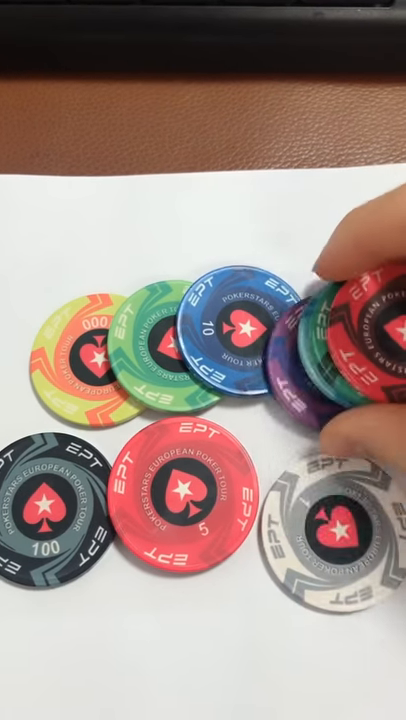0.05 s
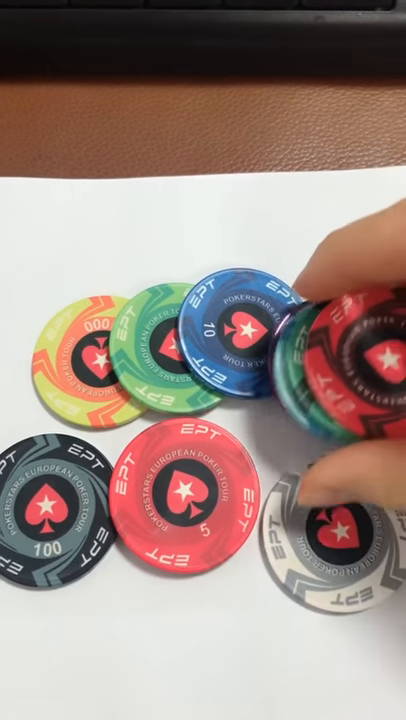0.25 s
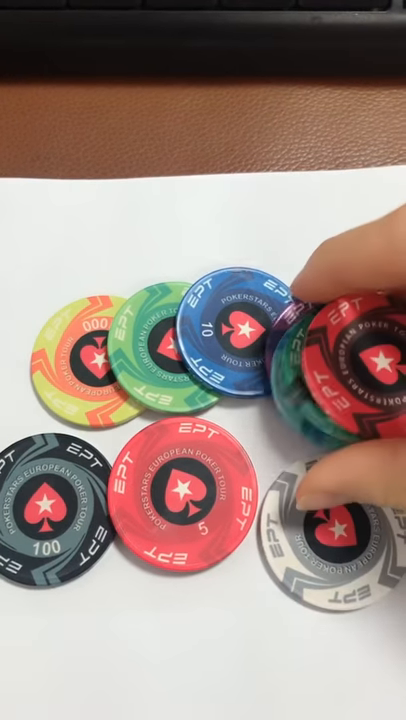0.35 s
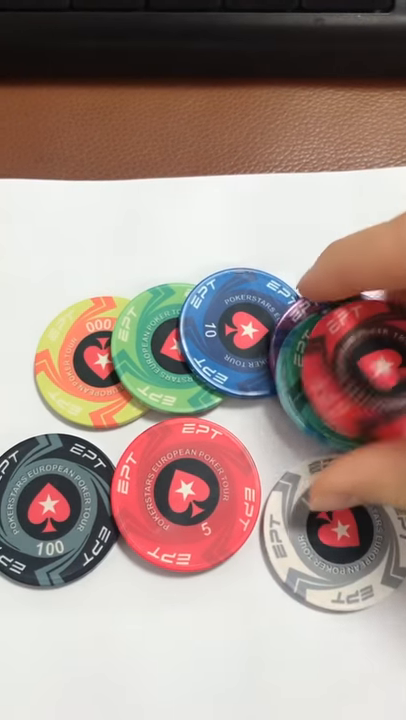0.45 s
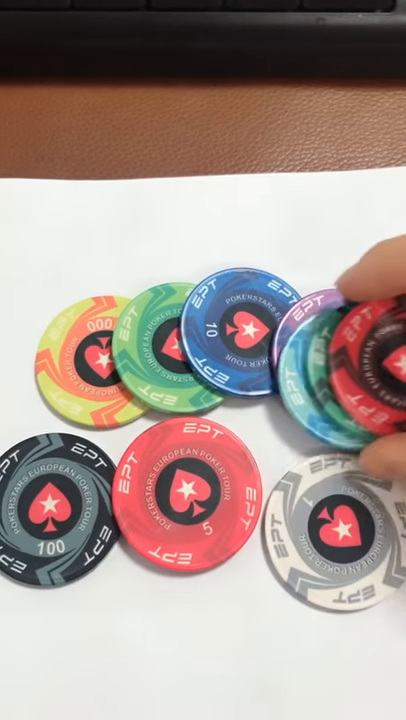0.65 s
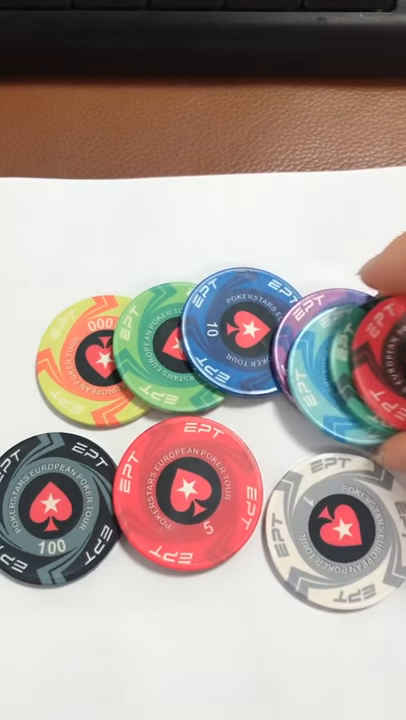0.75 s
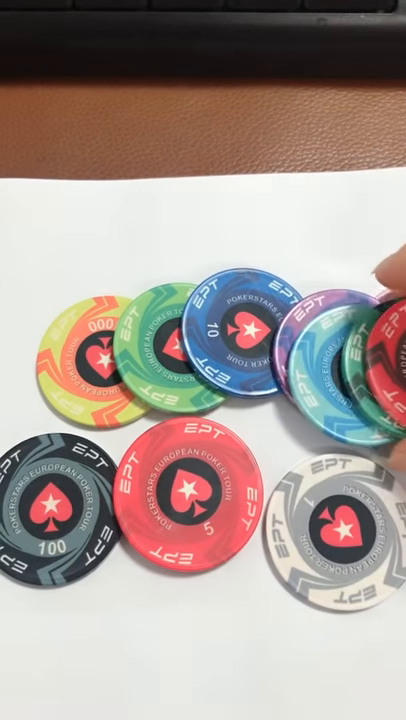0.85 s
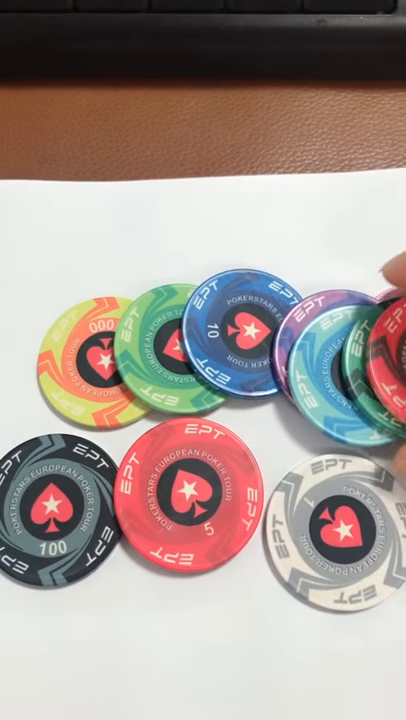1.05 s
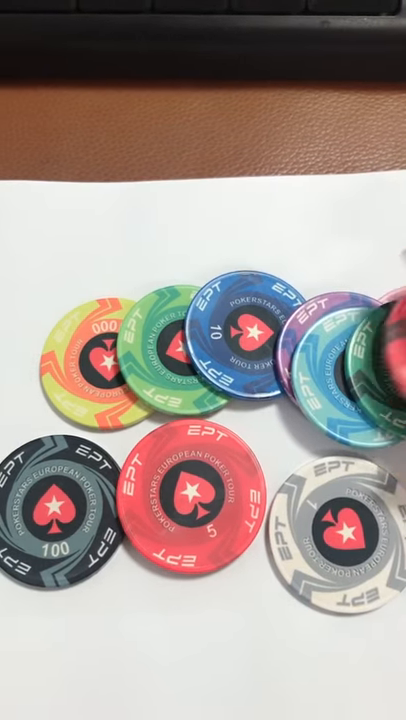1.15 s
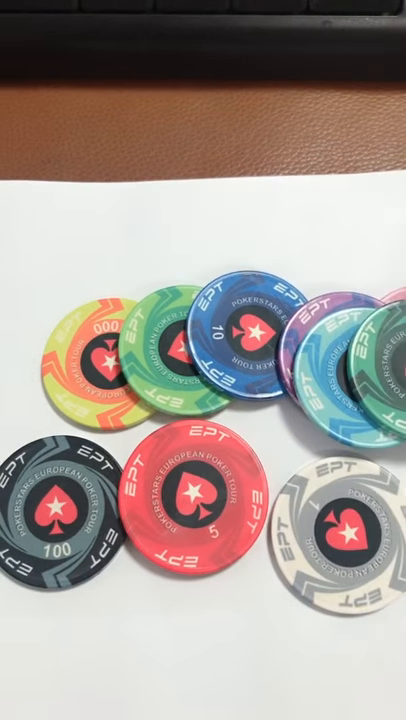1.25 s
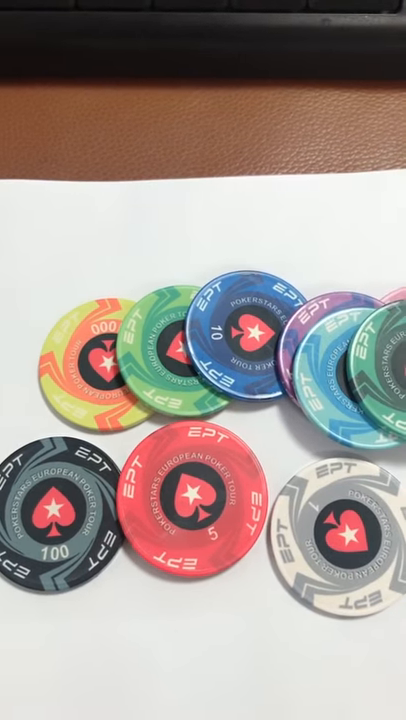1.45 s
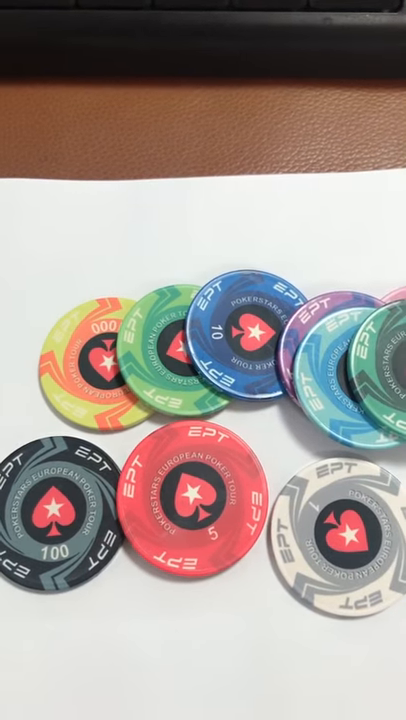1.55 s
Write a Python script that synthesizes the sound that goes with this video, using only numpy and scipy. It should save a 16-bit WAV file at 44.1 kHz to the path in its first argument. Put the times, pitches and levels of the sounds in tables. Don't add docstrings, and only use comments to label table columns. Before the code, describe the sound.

Hard plastic poker chips spill in one fast, bright clatter, bounce and slap flat on a paper-covered wooden desk, tick faintly later, then a held stack clicks down dully; small room, close handheld phone.

```python
import sys
import numpy as np
from scipy import signal
from scipy.fft import rfft, irfft, next_fast_len
from scipy.io import wavfile
from scipy.ndimage import uniform_filter1d

SR = 44100
rng = np.random.default_rng(int(sys.argv[2]) if len(sys.argv) > 2 else 0)


def how_loud(loudness_db):
    steps = np.asarray(loudness_db, float) / 20
    return 10 ** steps


def materialize(psi):
    bounded = np.clip(np.atleast_2d(psi).T, -1, 1)
    quanta = np.round(bounded * 32767).astype(np.int16)
    wavfile.write(sys.argv[1], SR, quanta)


N = 70560
EARLY = SR // 10
TAIL = SR // 2
ATTACK_S, RING_ATTACK_S, KNOCK_ATTACK_S = 0.00025, 0.0005, 0.0011
CRACK_T60_S = 0.0074


def unit(x):
    return x / np.sqrt(np.mean(x ** 2) + 1e-20)


def along(points, hz):
    f, value = np.transpose(points)
    return np.interp(np.log(hz + 1), np.log(f + 1), value)


def filtered(x, response):
    size = next_fast_len(len(x) + SR // 4)
    spectrum = rfft(x, size) * response(np.fft.rfftfreq(size, 1 / SR))
    return irfft(spectrum, size)[:len(x)]


def resonance(hz, width_hz):
    return lambda f: 1j * f * width_hz / (hz * hz - f * f + 1j * f * width_hz)


def noise_band(length, hz, width_hz):
    return unit(filtered(rng.standard_normal(length), resonance(hz, width_hz)))


def narrow_noise_band(length, hz, width_hz):
    band = resonance(hz, width_hz)
    return unit(filtered(rng.standard_normal(length), lambda f: band(f) ** 2))


def rise(t, attack_s):
    return 1 - np.exp(-t / attack_s)


def seconds(length):
    return np.arange(length) / SR


def silence():
    return np.zeros(N + EARLY)


def add(track, s, sound):
    at = max(round(s * SR) + EARLY, 0)
    track[at:at + len(sound)] += sound[:len(track) - at]


def ring(modes, t, detune, attack_s):
    hz, db, t60 = np.transpose(modes)[:, :, None]
    level_luck, pitch_luck, phase_luck = rng.standard_normal((3, len(modes), 1))
    waves = np.sin(2 * np.pi * hz * (1 + detune * pitch_luck) * t + np.pi * phase_luck)
    levels = how_loud(db + 2.5 * level_luck - 60 * t / t60)
    return (levels * waves).sum(axis=0) * rise(t, attack_s)


# (f/Hz, t60/s)
ROOM_DECAY = [(300, 0.89), (2000, 0.15), (5500, .3), (6600, 0.43), (10000, 0.16), (12500, .2),
              (16000, 0.18)]
# (f/Hz, level/dB)
ROOM_TONE_COLOUR = [(1000, 5), (5900, -2), (6900, -3.5), (10500, -1), (15000, -4)]


def room(sound, wet_db=0):
    wet_level_db, delay_s, near_db, near_t60_s = -11.5, 0.003, -8.5, 0.03
    hz, t, grains = signal.stft(rng.standard_normal(TAIL), SR, nperseg=256)
    fade_db = along(ROOM_TONE_COLOUR, hz)[:, None] - 60 * t / along(ROOM_DECAY, hz)[:, None]
    tail = signal.istft(grains * how_loud(fade_db), SR, nperseg=256)[1]
    tail = tail * rise(seconds(len(tail)), delay_s)
    tail = tail / np.linalg.norm(tail[:EARLY])
    answer = how_loud(wet_level_db + wet_db) * signal.fftconvolve(sound, tail)
    near = rng.standard_normal(EARLY) * how_loud(-60 * seconds(EARLY) / near_t60_s)
    near = how_loud(near_db) * signal.fftconvolve(sound, near / np.linalg.norm(near))
    answer[:len(near)] += near
    answer[:len(sound)] += sound
    return answer


# (f/Hz, level/dB per Hz)
AIR_SPECTRUM = [(70, -6.5), (120, -8), (300, -13), (600, -21.5), (2200, -25.5), (3800, -36), (8200, -44.5),
                (16000, -51)]


def room_air():
    return how_loud(-53.5) * unit(filtered(rng.standard_normal(N), lambda f: how_loud(along(AIR_SPECTRUM, f))))


# (f/Hz, level/dB, wander/Hz)
FAN_TONES = [
    (118.5, -60.5, 48),
    (383, -62.5, 0.93),
]


def fan():
    total = np.zeros(N)
    for hz, db, wander_hz in FAN_TONES:
        skirt = noise_band(N, hz, wander_hz)
        tone = how_loud(9) * np.sin(2 * np.pi * hz * seconds(N))
        total += how_loud(db) * unit(skirt + tone)
    return total


# (t/s, level/dB)
GRIP_LEVEL = [(0.0, -49.5), (0.12, -61.5), (0.16, -51), (0.484, -44), (0.502, -49.5), (0.77, -61),
              (0.86, -50.5), (1.002, -54), (1.024, -47.5), (1.166, -52.5), (1.23, -34), (1.314, -51),
              (1.416, -39.5), (1.496, -57.5), (1.576, -44.5), (1.6, -72)]


def grip_rumble():
    rumble = narrow_noise_band(N, 40.4, 22.3)
    strength = np.sqrt(np.abs(uniform_filter1d(rumble ** 2, SR // 16)))
    rumble = unit(rumble / (strength + 0.39))
    return how_loud(np.interp(seconds(N), *np.transpose(GRIP_LEVEL))) * rumble


# (f/Hz, level/dB, t60/s)
CHIP_HIGH_MODES = [(9330, -16, 0.0082), (9790, -13, .005), (11050, -18, .003), (12100, -4, 0.005),
                   (13700, -12.5, 0.0037), (14600, -7.5, 0.006), (14400, -7, 0.01), (14900, -12, 0.0044)]


def contact(hz, high_db, low_db, low_modes):
    t = seconds(SR // 20)
    start = rise(t, RING_ATTACK_S)
    twin_hz = 2 * 6176 - hz
    twin = how_loud(-7.5) * np.sin(2 * np.pi * (twin_hz * t + rng.random()))
    main = (np.sin(2 * np.pi * hz * t) + twin) * how_loud(-60 * t / 0.012) * start
    crack = how_loud(-20 - 60 * t / CRACK_T60_S) * rng.standard_normal(len(t))
    slap = how_loud(-22 - 60 * t / 0.012) * noise_band(len(t), 2600, 7400)
    high = ring(CHIP_HIGH_MODES, t, 0.022, ATTACK_S) + crack
    low = ring(low_modes, t, 0.015, ATTACK_S) + slap
    skirt = how_loud(-7 - 60 * t / 0.007) * noise_band(len(t), 6400, 850)
    return main + skirt * start + how_loud(high_db) * high + how_loud(low_db) * low


def touches(rows, low_modes):
    track = silence()
    for s, db, hz, high_db, low_db in rows:
        add(track, s, room(how_loud(db) * contact(hz, high_db, low_db, low_modes)))
    return track[EARLY:]


# (t/s, level/dB, main ring f/Hz, high modes level/dB, low modes level/dB)
CHIP_HITS = [(-.09, -26.5, 6000, 10, 1.5), (-.06, -26, 6530, 6, 4), (0.2105, -63.5, 6000, -1.5, 2),
             (0.2153, -63, 5730, -4, -3), (0.2324, -46.5, 6400, -7.5, -3.5), (0.2336, -7, 6437, -1, -6),
             (0.238, -17.5, 6430, 1.5, -3), (.2420, -20, 6500, 4, -1), (0.2461, -19, 6840, 3.5, 0.5),
             (0.2533, -24, 6300, -4.5, 7.5), (.2566, -14.5, 5980, 8, -7.5), (.2578, -10, 6600, -8, -12.5),
             (0.2632, -27, 6900, -4.5, -6), (.2756, -15.5, 6440, 7.5, -8),
             (0.2786, -18.5, 6590, -4.5, -1.5), (0.2798, -18, 6450, -5.5, -3), (0.2823, -17, 6250, -2, -1),
             (.2860, -26.5, 6620, -3.5, 2.5), (.2945, -25.5, 6210, 6.5, -2.5),
             (.2970, -28.5, 6520, -5, -1.5), (0.3102, -41, 6530, -2, 11.5)]
# (f/Hz, level/dB, t60/s)
FREE_LOW_MODES = [(1350, -27.5, 0.014), (1750, -13, 0.011), (2322, -17, 0.006), (2803, -12, 0.0082),
                  (3330, -17, 0.013), (3750, -7.5, 0.011), (4340, -11.5, 0.012), (4700, -14.5, .008)]


def clatter():
    return touches(CHIP_HITS, FREE_LOW_MODES)


SCUFF_TIMES = [-.05, -.04, .5, .5677, .5677, 1.035, 1.042, 1.042, 1.138, 1.138, 1.174, 1.174, 1.3155, 1.425,
               1.427, 1.427, 1.433]
# (level/dB, centre f/Hz, width/Hz, t60/s)
SCUFF_SOUNDS = [(-50.5, 3000, 6100, .3), (-67, 10000, 7000, 0.18), (-73, 14000, 1200, .4),
                (-59, 15100, 3400, 0.23), (-65.5, 6100, 5300, 0.17), (-59.5, 13500, 600, 0.23),
                (-68, 12100, 510, 0.2), (-65.5, 5800, 5800, 0.3), (-64, 14700, 2400, .35),
                (-68, 9400, 6600, 0.28), (-57, 2600, 230, 0.12), (-66.5, 5500, 3500, 0.23),
                (-66.5, 13600, 4500, 0.42), (-53, 1900, 1700, 0.31), (-58.5, 1200, 270, 0.23),
                (-62, 7100, 7100, .3), (-57, 14800, 3200, 0.24)]


def scuffs():
    track, t = silence(), seconds(TAIL)
    for s, (db, hz, width_hz, t60) in zip(SCUFF_TIMES, SCUFF_SOUNDS):
        hiss = narrow_noise_band(TAIL, hz, width_hz)
        add(track, s, how_loud(db - 60 * t / t60) * rise(t, 0.0039) * hiss)
    return track[EARLY:]


# (t/s, level/dB, f/Hz, t60/s)
SINGLE_MODES = [(.2378, -24.5, 14900, .005), (.2420, -9, 14800, 0.0067), (.2458, -9, 14200, 0.0057),
                (.2546, -23, 12300, .004), (0.256, -8, 14900, 0.005), (0.2551, -13, 9700, 0.0034),
                (0.2563, -8, 11900, 0.0042), (.2756, -17, 14700, .005), (.3350, -19, 12160, 0.0042),
                (0.3662, -34, 1800, 0.0054), (.3695, -24.5, 1950, 0.0062), (.3697, -24, 11700, 0.0044),
                (0.406, -46, 1700, 0.0037), (0.4097, -44, 1700, 0.0041), (0.4326, -36.5, 1740, 0.0072),
                (.4318, -31.5, 3850, 0.0038), (.9510, -36, 3690, 0.0057), (.9615, -52, 6470, .012),
                (.9700, -42, 6500, .012), (.2338, -14, 3750, 0.0072), (.2790, -27, 1750, .01),
                (.9511, -31, 2600, 0.0037), (.9512, -32, 11840, .004), (0.37, -33.5, 3140, .006),
                (0.3694, -31, 3900, .008), (.4070, -39, 2800, 0.0068), (.4075, -42, 3560, .006),
                (0.3349, -36, 2930, 0.0075), (.2567, -14, 15500, .003)]


def grazes():
    track, t = silence(), seconds(SR // 50)
    for s, db, hz, t60 in SINGLE_MODES:
        add(track, s, room(ring([(hz, db, t60)], t, 0, ATTACK_S)))
    return track[EARLY:]


DESK_WET_DB = -7
# (t/s, level/dB)
DESK_HITS = [
    (.236, -40),
    (0.251, -35),
    (0.263, -35),
    (0.282, -37.5),
    (0.336, -67),
    (.372, -39.5),
    (.408, -47),
    (1.549, -29),
]
# (f/Hz, level/dB, t60/s)
DESK_MODES = [(293, -5, 0.04), (381, -5, 0.059), (475, -12, 0.041), (596, -8.5, 0.03566), (696, -10, 0.02),
              (887, -21, 0.012), (1069, -9, 0.0091), (1648, -15, 0.02), (2340, -6, 0.0079)]


def desk_knocks():
    track, t = silence(), seconds(SR // 5)
    for s, db in DESK_HITS:
        knock = how_loud(db) * ring(DESK_MODES, t, 0.05, KNOCK_ATTACK_S)
        add(track, s, room(knock, DESK_WET_DB))
    return track[EARLY:]


# (end t/s, level/dB, length/s, main ring f/Hz, low modes level/dB)
FLATTENING = [
    (0.252, -28, 0.0018, 5970, -27),
    (0.255, -23.5, 0.0038, 6000, -2),
    (0.278, -30, 0.0033, 6170, -4),
    (.4316, -42, 0.0031, 5800, 15.5),
    (0.3196, -35, 0.0021, 6200, -2),
    (0.369, -25, .006, 5720, 9),
    (0.4075, -26.5, 0.0065, 6370, 10),
    (0.964, -44, 0.003, 6500, -5),
    (.9682, -42, .004, 6430, 14.5),
    (0.983, -48, 0.0041, 6370, -1),
]
# (f/Hz, level/dB, t60/s)
DAMPED_LOW_MODES = [(1208, -15, 0.0089), (1823, -8.5, 0.0054), (2050, -16.5, 0.005), (2920, -16, 0.005),
                    (3717, -15.5, 0.005), (4307, -16.5, .005)]


def rolls():
    track = silence()
    t = np.arange(-SR // 40, 0) / SR
    for s, db, length_s, hz, low_db in FLATTENING:
        swell = how_loud(12 * t / length_s) * (t > -length_s)
        tiny_hits = swell * rng.standard_normal(len(t))
        tiny_hits = tiny_hits / np.linalg.norm(tiny_hits)
        rolled = signal.fftconvolve(contact(hz, -10.5, low_db, DAMPED_LOW_MODES), tiny_hits)
        add(track, s + t[0], room(how_loud(db) * rolled))
    return track[EARLY:]


# t/s, level/dB, f/Hz, attack/s, t60/s
DESK_BOOM = (.31, -45, 196, .03, 1.2)


def desk_boom():
    track, t = silence(), seconds(SR // 5)
    s, db, hz, attack_s, t60 = DESK_BOOM
    fade_out = np.cos(np.pi / 2 * t / t[-1])
    boom = np.sin(2 * np.pi * hz * t) * how_loud(db - 60 * t / t60)
    add(track, s, boom * rise(t, attack_s) * fade_out)
    return track[EARLY:]


# (t/s, level/dB, main ring f/Hz, high modes level/dB, low modes level/dB)
EDGE_HITS = [
    (.3350, -30, 5650, 12.5, 5),
    (.9506, -41, 6450, 0, 11),
    (.9512, -34, 6540, 2, 10.5),
    (1.0425, -63, 6550, 9, 4.5),
]
# (f/Hz, level/dB, t60/s)
EDGE_LOW_MODES = [(1114, -19.5, 0.011), (1960, -6, 0.0064), (2880, -6.5, 0.0058), (3520, -11.5, .005),
                  (4260, -18.5, 0.0075)]


def edge_landings():
    return touches(EDGE_HITS, EDGE_LOW_MODES)


# (t/s, level/dB, main ring f/Hz, high modes level/dB, low modes level/dB)
PAPER_HITS = [
    (.3695, -20.5, 5970, -2.5, -1.5),
    (.4072, -37, 5800, -6, 1),
    (.4318, -37, 6000, -8, 8),
    (0.9686, -34, 6510, -22, 6.5),
    (1.138, -58.5, 6250, 9, 18.5),
]


def paper_taps():
    return touches(PAPER_HITS, DAMPED_LOW_MODES)


# (t/s, level/dB)
SET_DOWN = [
    (1.5292, -42),
    (1.5477, -35.5),
    (1.5479, -34),
    (1.5509, -44.5),
]
# (f/Hz, level/dB, t60/s)
STACK_MODES = [(1700, 3, 0.0055), (2280, 2, 0.0078), (2710, -1.5, 0.0077), (3750, -2, 0.0087),
               (4090, 2.5, 0.0062), (4640, -3, 0.0048), (5070, -4, 0.0049), (5980, -6, 0.0057),
               (6900, -0.5, 0.0036), (8560, -9, 0.0062), (13000, -18, 0.0035)]


def stack():
    track, t = silence(), seconds(SR // 20)
    for s, db in SET_DOWN:
        click = ring(STACK_MODES, t, 0.0069, ATTACK_S)
        crack = how_loud(-6.5 - 60 * t / CRACK_T60_S) * rng.standard_normal(len(t))
        add(track, s, room(how_loud(db) * (click + crack)))
    return track[EARLY:]


# (t/s, level/dB, f/Hz, t60/s)
ROCKING = [
    (1.5298, -40.5, 703, 0.026),
    (1.5305, -39, 447, 0.07),
    (1.5485, -35, 420, 0.044),
    (1.5495, -35, 1110, 0.022),
    (1.551, -35, 729, 0.038),
    (1.555, -32, 373, .055),
    (1.5595, -33.5, 800, 0.022),
    (1.562, -43, 490, 0.034),
    (1.55, -48, 130, .08),
]


def desk_thuds():
    track, t = silence(), seconds(SR // 5)
    for s, db, hz, t60 in ROCKING:
        add(track, s, room(ring([(hz, db, t60)], t, 0, KNOCK_ATTACK_S), DESK_WET_DB))
    return track[EARLY:]


# (f/Hz, level/dB)
MIC_COLOUR = [(500, -0.5), (5000, 3.5), (7000, 2), (7500, -3.5), (8000, -4.5), (8600, 3.5), (15780, -2),
              (15900, -52)]


def scene():
    chips = clatter() + paper_taps() + edge_landings() + grazes() + rolls()
    near = chips + scuffs() + desk_knocks() + desk_thuds() + desk_boom() + stack()
    coloured = filtered(near, lambda f: how_loud(along(MIC_COLOUR, f)))
    background = room_air() + fan() + grip_rumble()
    return (coloured + background)[None]


def band_limit(x):
    return signal.sosfilt(signal.butter(12, 17000, fs=SR, output="sos"), x)


def record(dry):
    return band_limit(dry)


dry = scene()
out = record(dry)
materialize(out)
```